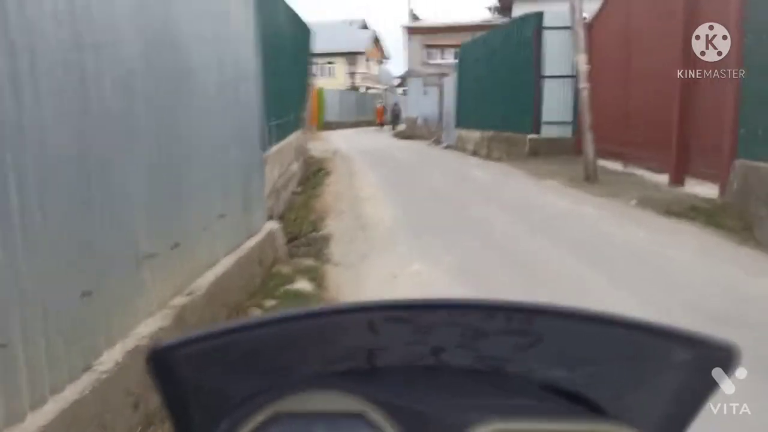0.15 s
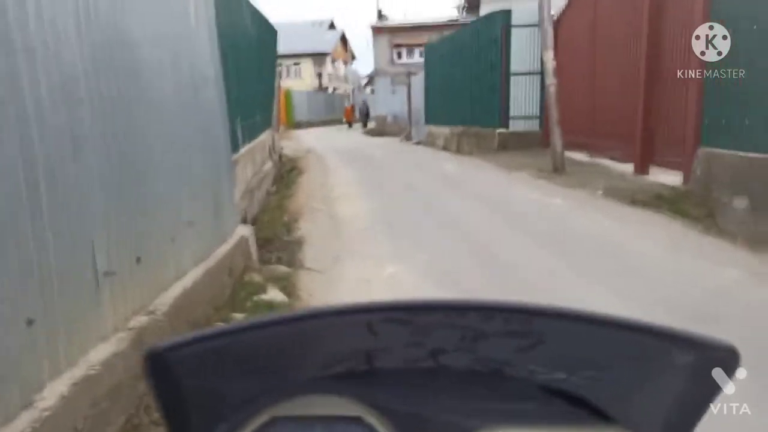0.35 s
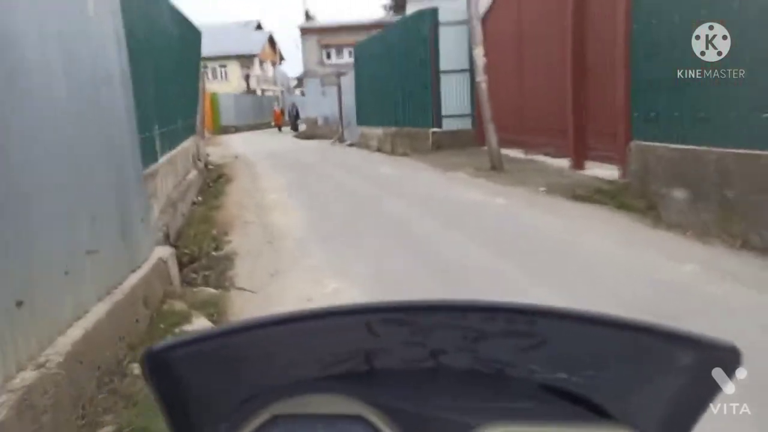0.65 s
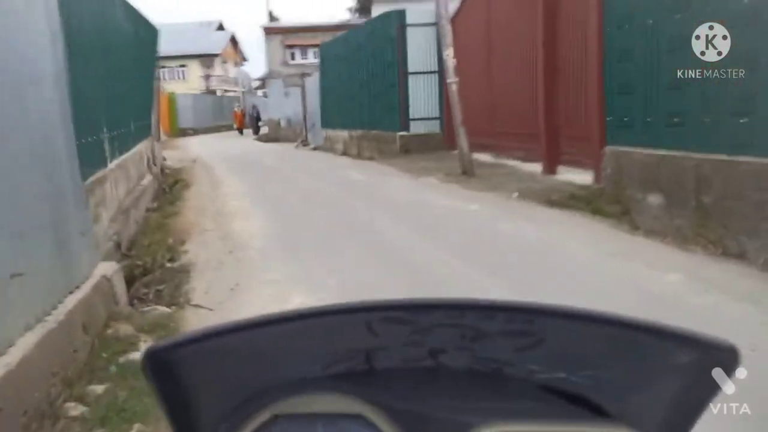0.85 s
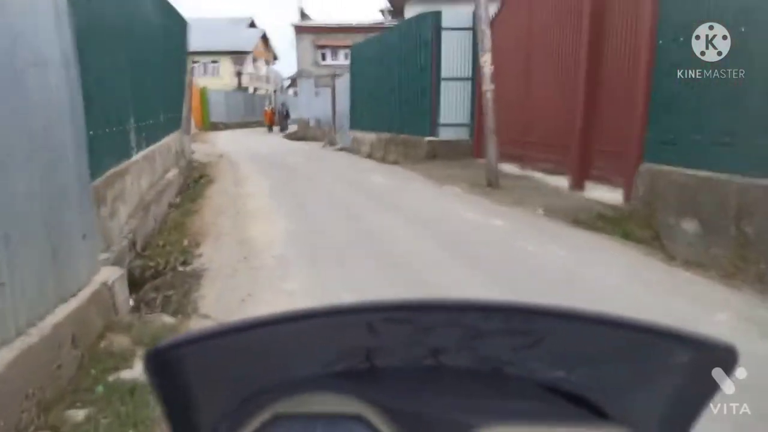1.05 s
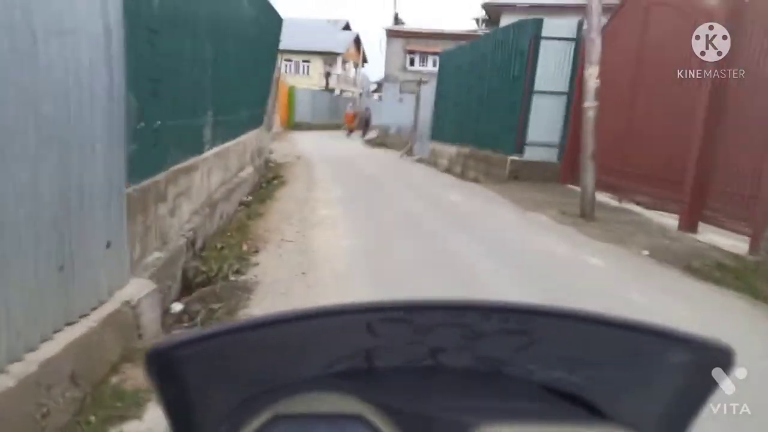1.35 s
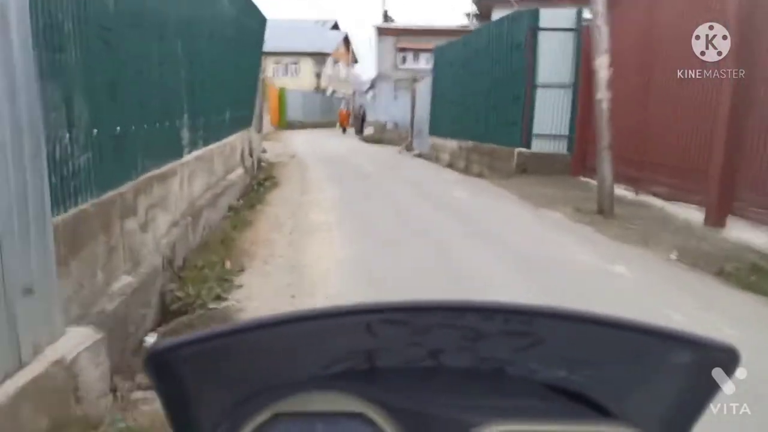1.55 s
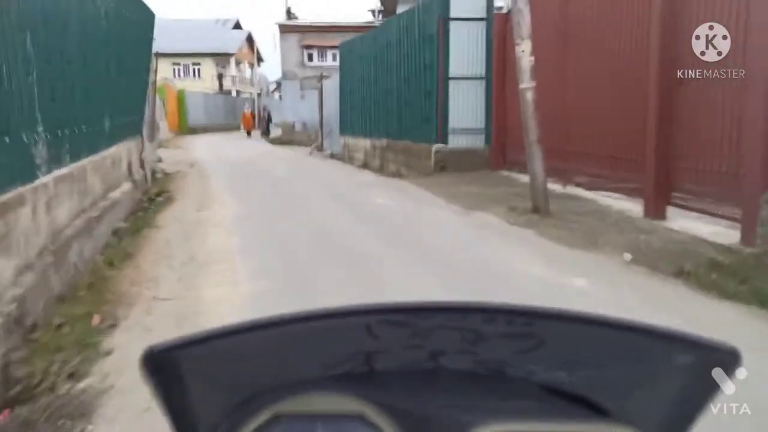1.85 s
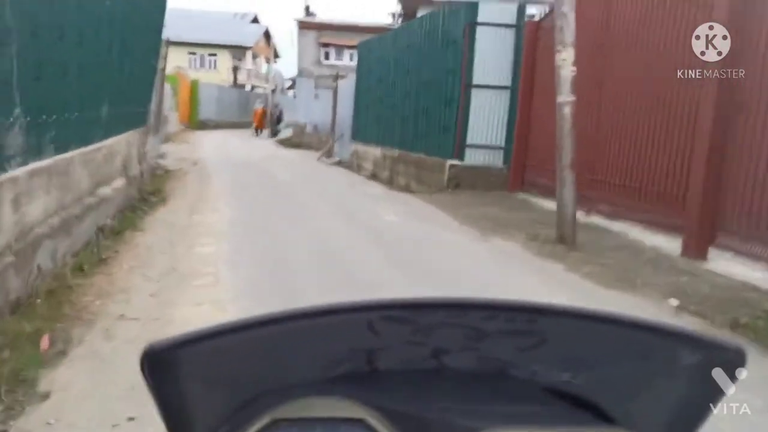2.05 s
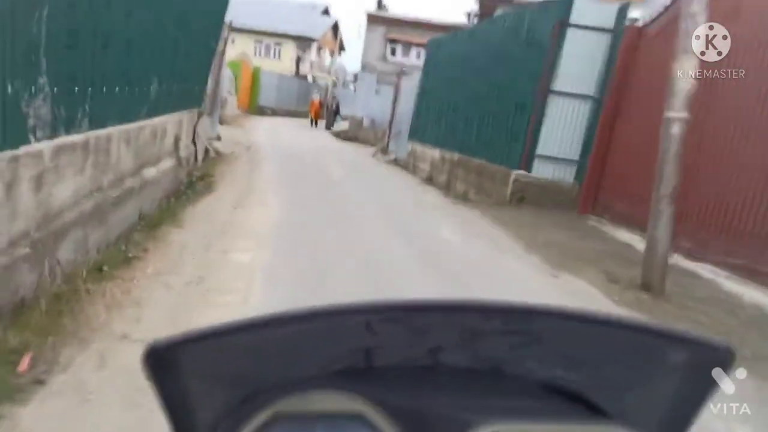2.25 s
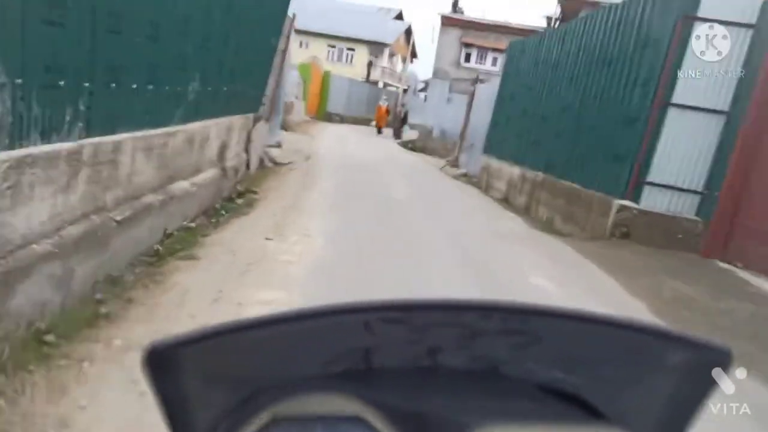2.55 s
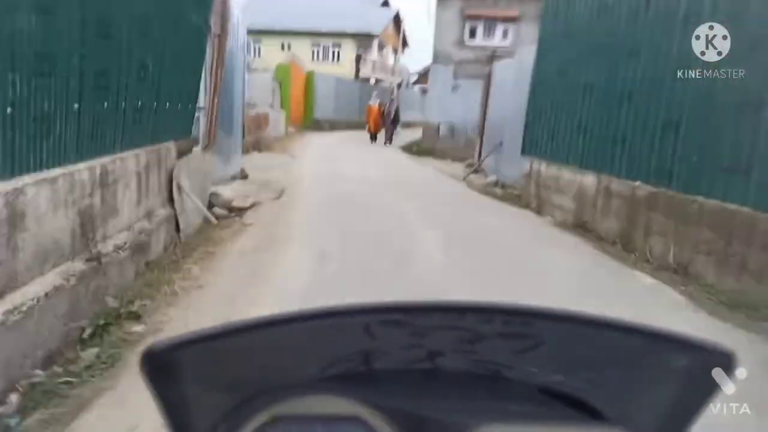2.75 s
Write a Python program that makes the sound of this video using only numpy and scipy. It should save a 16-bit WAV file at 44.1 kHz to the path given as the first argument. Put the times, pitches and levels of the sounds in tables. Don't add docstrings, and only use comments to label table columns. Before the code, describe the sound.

A small single-cylinder scooter heard close from the saddle in a narrow walled lane: uneven low putters with a fading brake hiss, then quicker thumps with gear whine and rattle, and a sudden cut.

```python
import sys
import numpy as np
from scipy import signal
from scipy.fft import rfft, irfft
from scipy.io import wavfile

SR = 44100
rng = np.random.default_rng(int(sys.argv[2]) if len(sys.argv) > 2 else 0)


def dump_mix(stems):
    frames = np.atleast_2d(stems).T
    limited = np.clip(frames, -1, 1)
    pcm = np.round(limited * 32767).astype(np.int16)
    wavfile.write(sys.argv[1], SR, pcm)


def voltage_ratio(decibels):
    exponent = np.asarray(decibels, float) / 20
    return 10 ** exponent


N = 127890


def t_axis():
    return np.arange(N) / SR


def rms_one(x):
    return x / np.sqrt(np.mean(x ** 2) + 1e-20)


def drift(rate):
    r = np.exp(-40 * np.pi * rate / SR)
    noise = rng.standard_normal(N // 20 + 2002)
    slow = signal.lfilter([1], [1, -2 * r, r * r], noise)[2000:]
    return np.interp(np.arange(N) / 20, np.arange(len(slow)), rms_one(slow))


def coloured(points, patchy_db):
    hz = np.maximum(np.fft.rfftfreq(N, 1 / SR), 1)
    p = np.array(points)
    curve_db = np.interp(np.log(hz), np.log(p[:, 0]), p[:, 1], -90, -90)
    spec = rfft(rng.standard_normal(N)) * voltage_ratio(curve_db)
    group = np.floor(3 * np.log2(hz)).astype(int) % 4
    out = np.zeros(N)
    for k in range(4):
        out += irfft(spec * (group == k), N) * voltage_ratio(patchy_db * drift(16))
    return rms_one(out)


def ring(clicks, hz, t60):
    r, w = voltage_ratio(-60 / (t60 * SR)), 2 * np.pi * hz / SR
    return signal.lfilter([0, np.sin(w)], [1, -2 * r * np.cos(w), r * r], clicks + 1e-18)


# t/s, level/dB
PUTTER = [(0.0937, -13.1), (0.2135, -11.1), (0.3369, -13.4), (0.4508, -11.7), (0.5651, -8.3),
          (0.6591, -10.5), (0.7575, -5.4), (0.8321, -8.3), (0.914, -8.5), (0.9863, -4.5), (1.0461, -4.8),
          (1.1001, -6.4), (1.162, -11), (1.2147, -8.5), (1.2676, -14.5)]
# t/s, level/dB
PULL = [
    (1.33, -3),
    (1.402, -2.5),
    (1.501, -8.5),
    (1.612, -12.5),
    (1.751, -7),
    (1.999, -6),
    (2.299, -5),
    (2.649, -5),
]
# t/s, firing rate/(1/s)
SPEED = [(1.33, 16.99), (1.43, 21.49), (1.52, 25.55), (1.6, 28.31), (1.7, 26.68), (1.9, 23.76),
         (2.05, 20.95), (2.2, 19.2), (2.4, 19.67), (2.7, 20.51)]


def firings():
    s, rate = np.transpose(SPEED)
    t = t_axis()
    cycles = np.cumsum(np.interp(t, s, rate) * (t > s[0])) / SR
    later = np.interp(np.arange(1, 30), cycles, t)
    putter_at, putter_level = np.transpose(PUTTER)
    pull_at = np.concatenate([[s[0]], later])
    at = np.concatenate([putter_at, pull_at])
    level = np.concatenate([putter_level, np.interp(pull_at, *np.transpose(PULL))])
    return at, level, 1 / np.gradient(at)


# f/Hz, climb/(Hz per firing/s), level/dB,
# gain/(dB per firing/s), swell peak/s, swell width/s
EXHAUST = [(118.4, 1.29, 0.94, -0.1348, 0.0079, 0.0093), (162, 1.3, -12.5, 1.37, 0.024, 0.022),
           (258.7, 1.1, -10.5, 0.33, 0.00076, 0.0048), (222, 0.074, -4.5, 1.06, 0.00012, 0.0017),
           (260.4, .6, -18.5, 1.14, 0.025, .02), (115.5, 1.2, -32.5, 0.4, 0.1, 0.0064),
           (388.3, .5, -19, 0.1, .0012, .008)]


def exhaust(at, level, rate):
    lead_s, scatter_db = .03, .8
    out, u = np.zeros(N + SR), np.arange(4000) / SR - lead_s
    scatter = rng.standard_normal((len(at), len(EXHAUST)))
    for s, db, r, row in zip(at, level, rate - 20, scatter):
        i = int((s - lead_s) * SR)
        for (hz, climb, mode_db, gain, peak, width), z in zip(EXHAUST, row):
            shape = np.exp(-((u - peak) / width) ** 2)
            size = voltage_ratio(db + mode_db + gain * r + scatter_db * z)
            out[i:i + 4000] -= size * shape * np.cos(2 * np.pi * (hz + climb * r) * u)
    return out[:N]


# f/Hz, level/dB, t60/s
CASE = [(485.5, -21, 0.11), (635.4, -16, 0.059), (880, -30.5, 0.16), (1126, -17, 0.02), (1537, -31.5, .04)]


def knock(at, level, rate):
    lead_cycle, burst_s, knock_db = .28, 0.0091, -26
    u = t_axis()[None] - (at - lead_cycle / rate)[:, None]
    bursts = np.exp(-(u / burst_s) ** 2)
    speed_loss_db = .7 * np.maximum(rate - 19, 0)
    out = 0
    for hz, db, t60 in CASE:
        scatter_db = 1.8 * rng.standard_normal(len(at))
        size = voltage_ratio(knock_db + db + level - speed_loss_db + scatter_db)
        bed = voltage_ratio(db - 42)
        out = out + ring((size @ bursts + bed) * rng.standard_normal(N), hz, t60)
    return out


# t/s, f/Hz, level/dB
WHINE = [
    (1.4, 1000, -32),
    (1.5, 1074, -25),
    (1.66, 1190, -25),
    (1.84, 1130, -23),
    (2.0, 946.2, -21.5),
    (2.14, 880, -26),
    (2.4, 879, -24),
    (2.66, 915, -23),
]


def whine(at, rate):
    burst_s, bend, scatter, blur_hz, blur_db = .0085, .07, .022, 110, -6
    s, hz, db = np.transpose(WHINE)
    t, out, u = t_axis(), np.zeros(N + SR), np.arange(-1000, 1000) / SR / burst_s
    arch = bend * (np.minimum(u ** 2, 2) - .4)
    for a, r, z in zip(at, rate, rng.standard_normal((len(at), 4))):
        between_db = -14 + 2.3 * (r - 20)
        for k, less in enumerate((0, between_db)):
            c = a + k * .5 / r
            f = np.interp(c, s, hz) * (1 + scatter * z[k] - arch)
            size = voltage_ratio(np.interp(c, s, db, -90) + 5 + less + 3.75 * z[k + 2])
            i = int(c * SR) - 1000
            out[i:i + 2000] += size * np.exp(-u ** 2) * np.sin(2 * np.pi * np.cumsum(f) / SR)
    phase = 2 * np.pi * np.cumsum(np.interp(t, s, hz)) / SR
    blur = drift(blur_hz) * np.cos(phase) + drift(blur_hz) * np.sin(phase)
    return out[:N] + voltage_ratio(np.interp(t, s, db, -90) + blur_db) * blur


def panel(at, rate):
    panel_hz, panel_db, panel_rate, rate_range = 482, -25, 25, 1.3
    t = t_axis()
    near = np.exp(-((np.interp(t, at, rate) - panel_rate) / rate_range) ** 2)
    near = near * (t > SPEED[3][0])
    level = voltage_ratio(panel_db + 2.7 * drift(20))
    return level * near * np.sin(2 * np.pi * panel_hz * t + 0.57 * drift(12))


def ticks(at, rate):
    clicks, z = np.zeros(N), rng.standard_normal((len(at), 2))
    for k, part in enumerate((0.24, .62)):
        i = ((at - part / rate) * SR).astype(int)
        clicks[i] = voltage_ratio(-27.5 + 0.95 * (rate - 21) + 3 * z[:, k])
    return ring(clicks, 7100, .003) + .4 * ring(clicks, 4400, 0.0037)


def swell(at, level, chance):
    rise_s, fall_s, scatter_db = .007, .016, 1.1
    u = t_axis()[None] - at[:, None]
    size = voltage_ratio(scatter_db * chance) * np.clip(1 + .05 * (level + 4), 0, 2)
    bump = np.exp(np.where(u < 0, -(u / rise_s) ** 2, -u / fall_s))
    return size @ bump


# t/s, level/dB
LOAD = [(0.0, -48), (0.29, -52.5), (0.53, -49.5), (0.75, -46.5), (1.12, -42.5), (1.37, -43), (1.55, -36),
        (1.7, -37), (2.15, -40), (2.46, -39.5)]


def drive_load():
    return np.interp(t_axis(), *np.transpose(LOAD))


# f/Hz, level/dB per Hz
RUMBLE = [(18, -74.5), (30, -20), (130, 5), (193, -1), (265, -8.5), (570, -12), (894, -12), (1000, -20),
          (1600, -40.5), (2080, -68), (3520, -120)]


def rumble(load, low):
    return voltage_ratio(-25.5 + (load + 43) + 1.5 * low) * coloured(RUMBLE, patchy_db=0.5)


# f/Hz, level/dB per Hz
RATTLE = [(1200, -10.5), (1500, -3.5), (2450, -9.5), (3700, -10), (4600, -9), (4780, -12.5), (4850, -19.5),
          (5600, -25)]


def rattle(load, high):
    return voltage_ratio(load + 1.5 + 8 * high) * coloured(RATTLE, patchy_db=2.0)


# f/Hz, level/dB per Hz
SIZZLE = [(4900, -15), (5900, -11), (6250, 0.5), (6700, 1), (7600, -1), (7750, -4.5), (8450, -9),
          (8600, -20.5), (11500, -44)]


def sizzle(load, high):
    return voltage_ratio(-39.5 + 1.12 * (load + 36.5) + 14.5 * high) * coloured(SIZZLE, patchy_db=2.5)


def air(load, high, grip):
    level_db = -56.5 + 11.5 * grip + 1.09 * (load + 36) + 14.5 * high + 1.5 * drift(12)
    return voltage_ratio(level_db) * coloured([(11620, 0), (15480, -.5)], patchy_db=0.5)


def brake_grip():
    hold_s, fade_s = 0.38, 0.13
    return 1 / (1 + np.exp((t_axis() - hold_s - fade_s) / (fade_s / 3)))


# f/Hz, width/Hz, level/dB
BRAKE = [
    (1346, 160, -34.5),
    (3700, 700, -45.5),
    (6770, 130, -37.5),
    (7800, 500, -66),
]


def brake(grip):
    hiss = np.zeros(N)
    for hz, width, db in BRAKE:
        hiss += voltage_ratio(db) * rms_one(ring(rng.standard_normal(N), hz, 0.9 / width))
    return grip * hiss


def scene():
    at, level, rate = firings()
    load, grip = drive_load(), brake_grip()
    chance = rng.standard_normal((len(at), 2))
    low = swell(at, level, 0.13 * chance[:, 0])
    high = swell(at, level, chance[:, 1])
    x = knock(at, level, rate) + ticks(at, rate) + brake(grip)
    x = signal.sosfilt(signal.cheby2(10, 45, 8700, fs=SR, output="sos"), x)
    x += exhaust(at, level, rate) + whine(at, rate) + panel(at, rate)
    x += rumble(load, low) + rattle(load, high) + sizzle(load, high) + air(load, high, grip)
    return x[None]


def band_limit(x):
    return signal.sosfilt(signal.butter(12, 16430, fs=SR, output="sos"), x)


def record(dry):
    stop_s, fade_s, tail_db, tail_t60_s = 2.6508, .0004, -22, .06
    after = t_axis() - stop_s
    x = np.tanh(dry)
    dull = signal.sosfilt(signal.butter(2, 600, fs=SR, output="sos"), x)
    tail = dull * voltage_ratio(tail_db - 60 * np.maximum(after, 0) / tail_t60_s)
    mix = np.where(after < 0, x * np.clip(-after / fade_s, 0, 1), tail)
    return band_limit(mix)


dry = scene()
out = record(dry)
dump_mix(out)
```